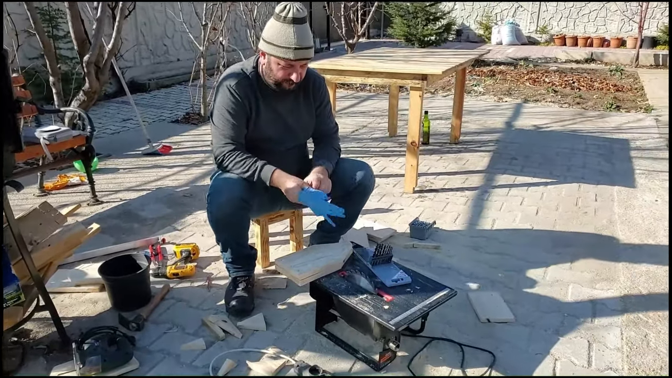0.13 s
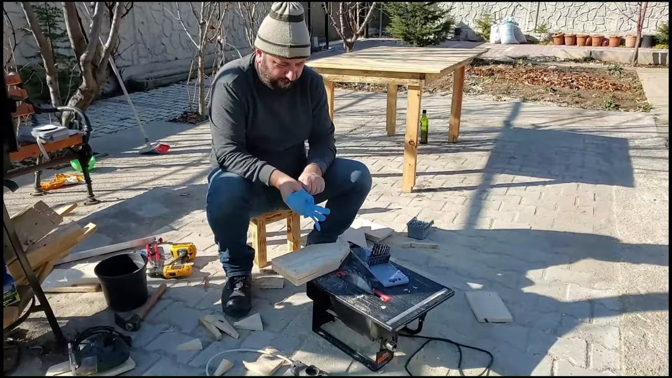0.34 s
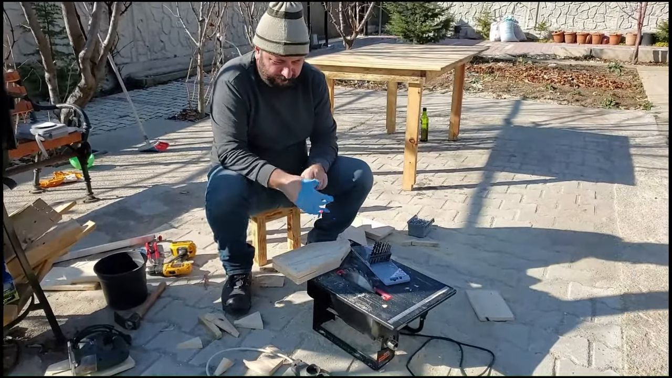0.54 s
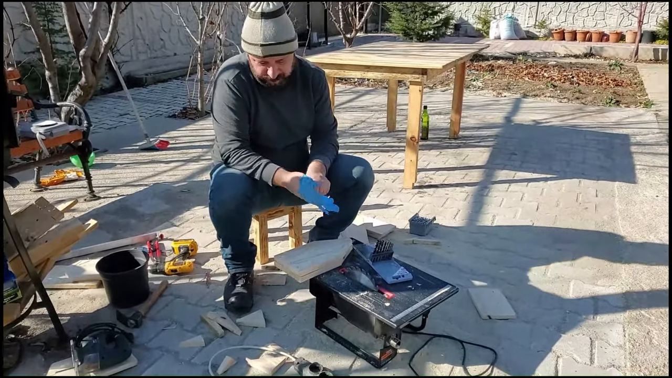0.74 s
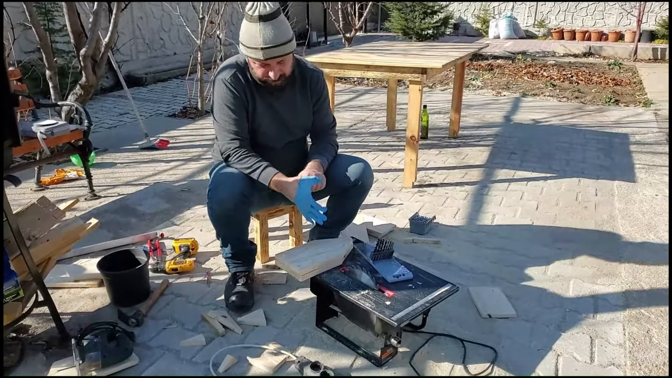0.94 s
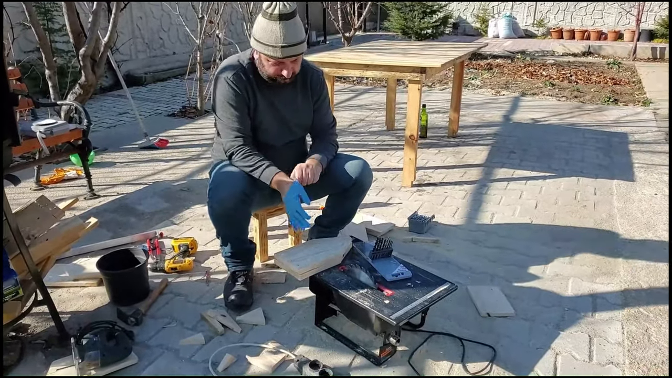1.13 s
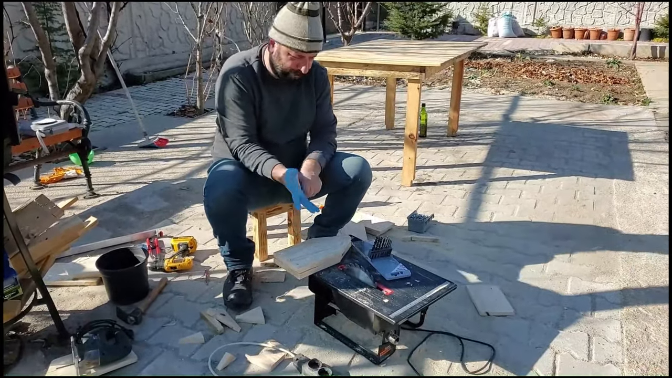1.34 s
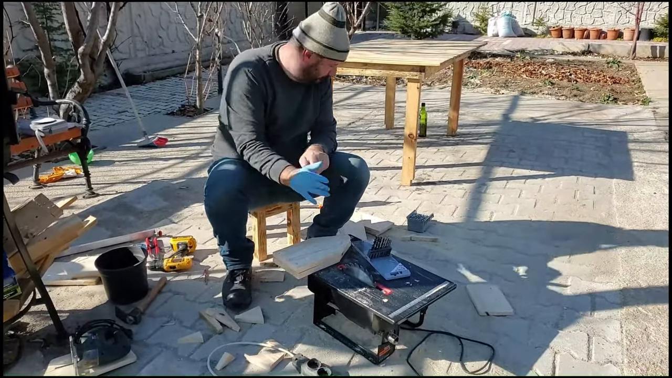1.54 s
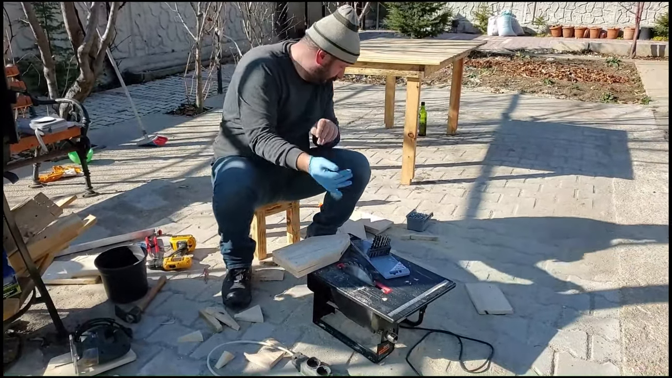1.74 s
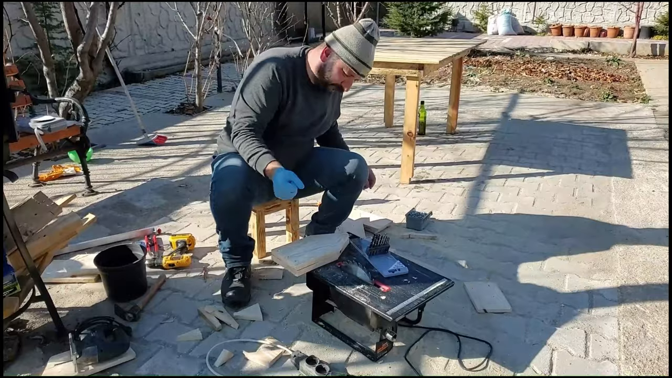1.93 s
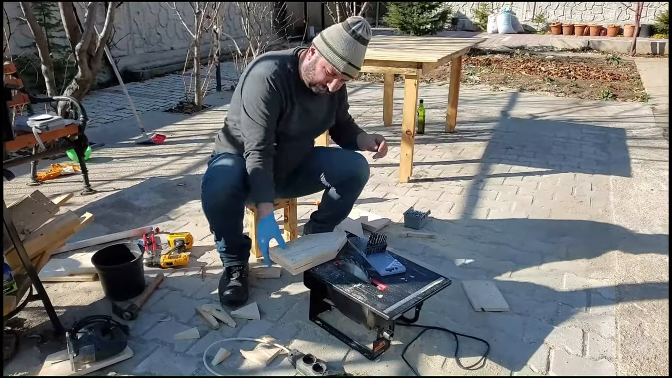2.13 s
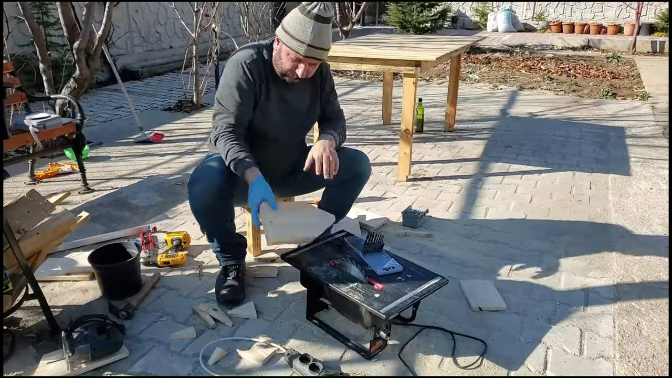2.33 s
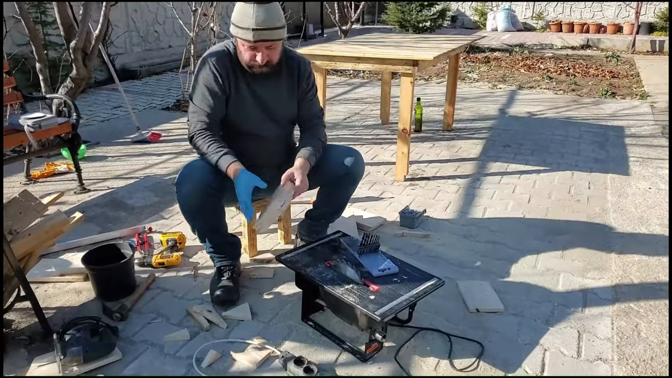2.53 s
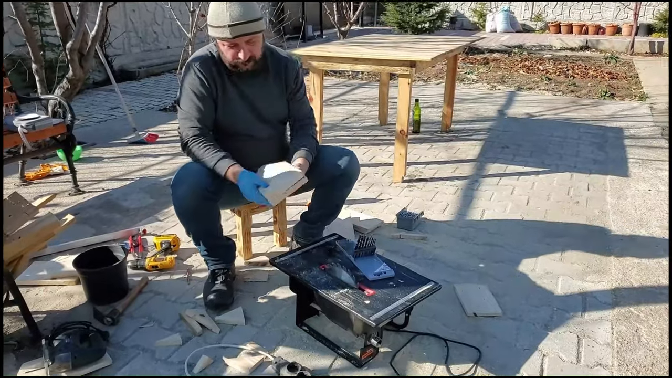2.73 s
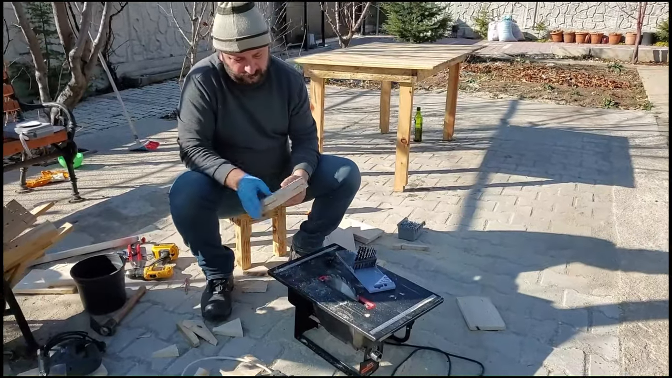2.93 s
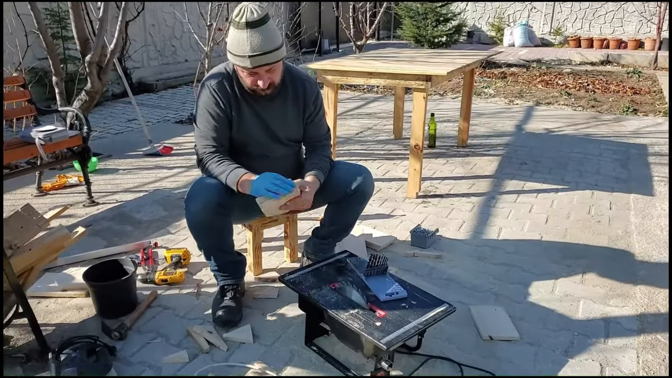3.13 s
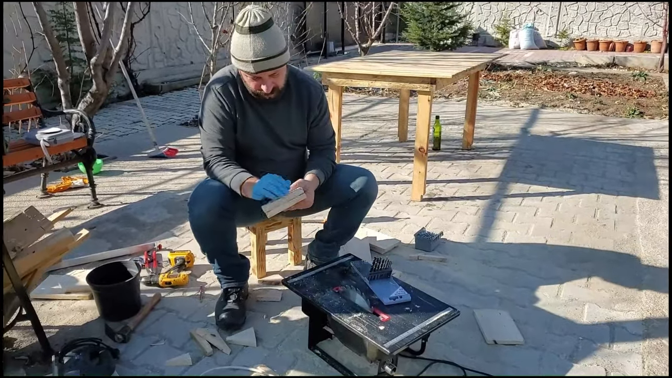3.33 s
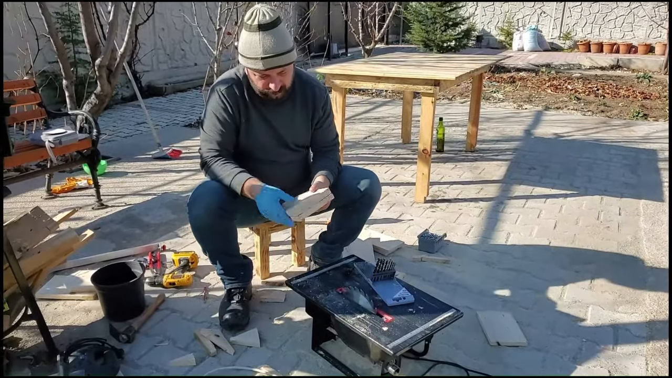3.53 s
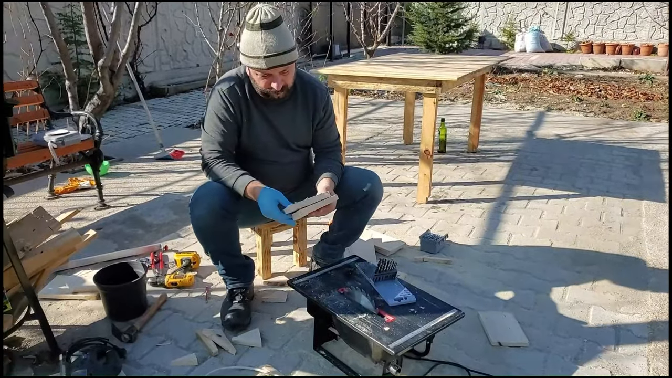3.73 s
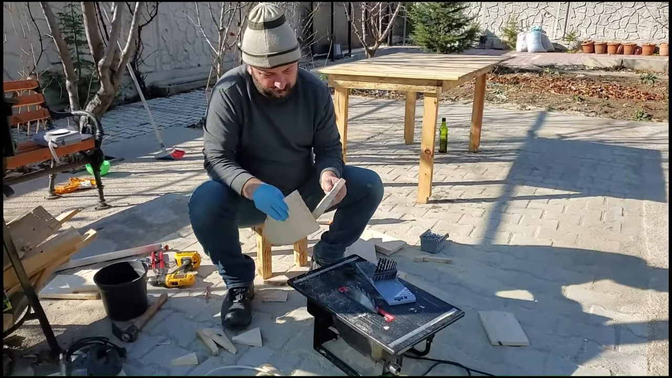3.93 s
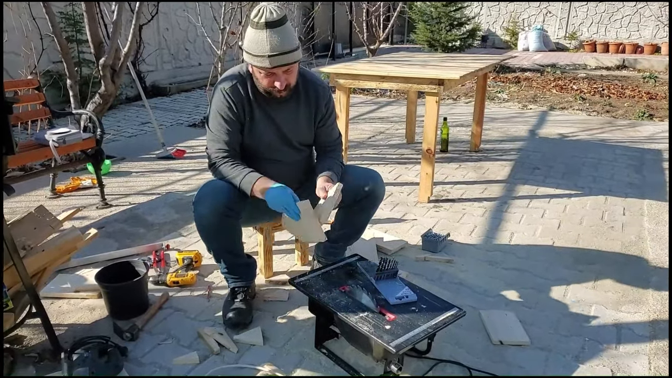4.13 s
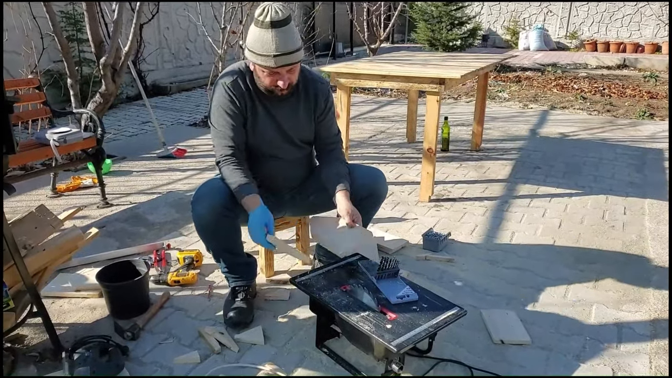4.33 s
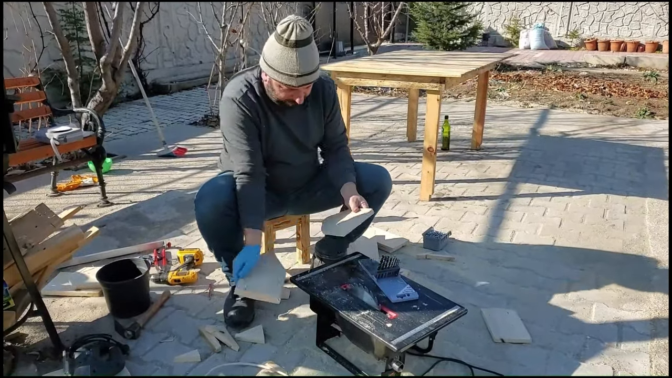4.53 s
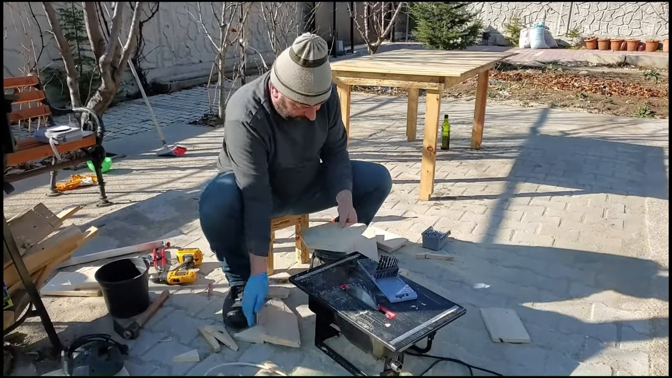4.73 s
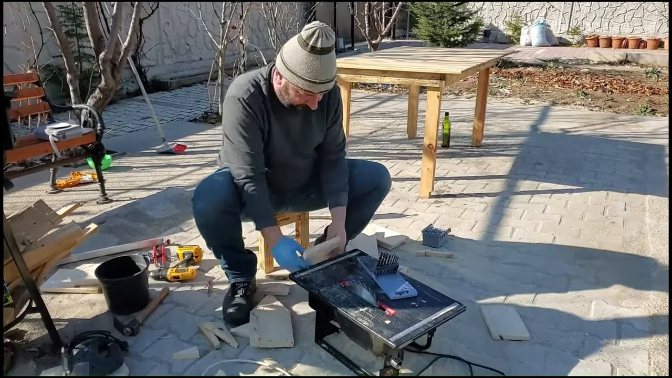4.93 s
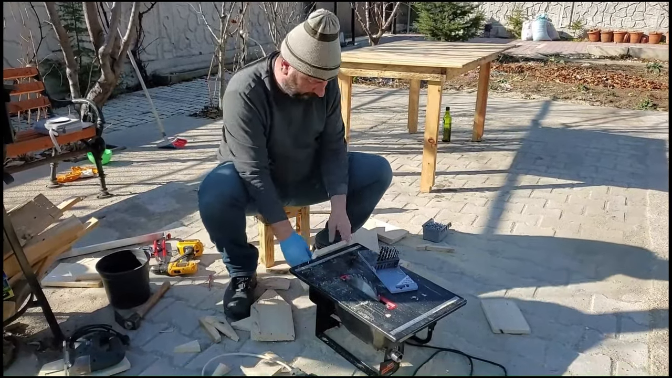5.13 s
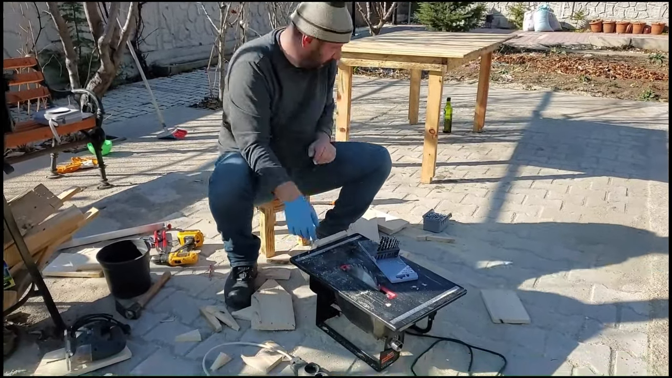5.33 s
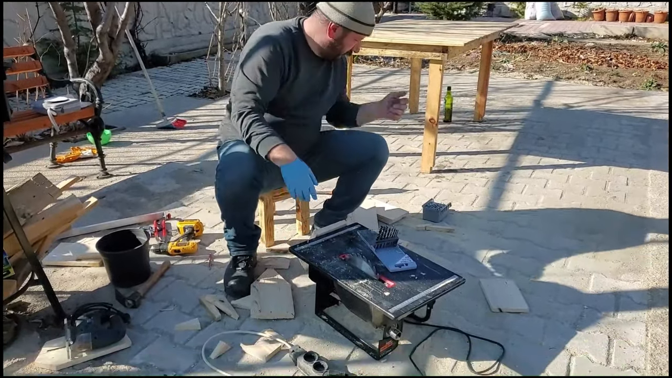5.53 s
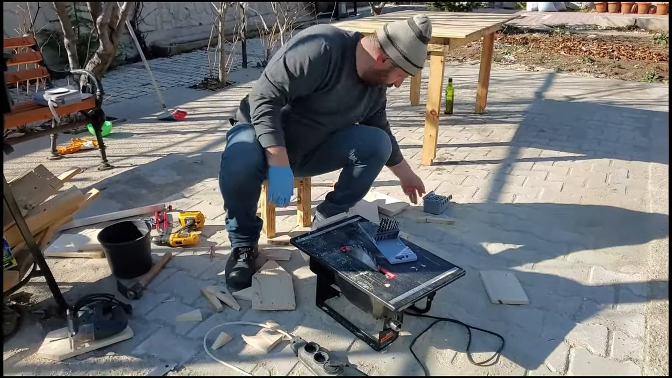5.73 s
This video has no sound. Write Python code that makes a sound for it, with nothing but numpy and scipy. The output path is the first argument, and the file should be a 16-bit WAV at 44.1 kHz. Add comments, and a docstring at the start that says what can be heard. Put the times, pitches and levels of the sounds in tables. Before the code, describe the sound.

Quiet outdoor handling sounds, slightly left of centre: rubber rustles, then snaps and briefly squeaks, followed by soft scuffs. Later come two dry, hollow wood claps, a bright hard clatter as a board is put down, and a soft knock on a saw table. Paving and walls give a short, faint reflection. Underneath are low rumble, a thin hum, light hiss and distant traffic that swells towards the end.

```python
"""Small boards clap together, knock and land on a table saw: damped modes, scrape, tick, thump, rebounds.
Before them a worker in a paved yard tugs a rubber glove tight: clumped noise rubs, damped noise snaps,
a stick-slip tone squeaks and soft bumps thump. Ground and walls answer with decaying noise.
Underneath lie a low outdoor rumble, a thin hiss and a swell of distant traffic with a hum."""
import sys
import numpy as np
from scipy import signal
from scipy.fft import rfft, irfft, next_fast_len
from scipy.io import wavfile
from scipy.ndimage import map_coordinates

SR = 44100
rng = np.random.default_rng(int(sys.argv[2]) if len(sys.argv) > 2 else 0)


def log_audio(samples):
    """Write samples as a 16-bit WAV file to the path given in sys.argv[1]."""
    # one column per channel
    frames = np.atleast_2d(samples).T
    # limit to full scale, then quantise
    limited = np.clip(frames, -1, 1)
    pcm = np.round(limited * 32767).astype(np.int16)
    wavfile.write(sys.argv[1], SR, pcm)


N = 254942


def amp(db):
    """Decibels to gain."""
    return 10 ** (np.asarray(db) / 20)


def unit(x):
    """Scale to rms 1."""
    return x / np.sqrt(np.mean(x ** 2) + 1e-20)


def along(points, hz):
    """Interpolate (Hz, value) points on a log frequency axis."""
    point_hz, value = np.transpose(points)
    return np.interp(np.log(hz + 1), np.log(point_hz + 1), value)


def curves(rows):
    """One value per sample for each column after the time."""
    time_s, *columns = np.transpose(rows)
    return [np.interp(np.arange(N) / SR, time_s, column) for column in columns]


def wobble(rate_hz):
    """A smooth random curve with rate_hz knots a second."""
    knots = rng.standard_normal(int(N * rate_hz / SR) + 4)
    return map_coordinates(knots, [np.arange(N) * rate_hz / SR])


def filtered(x, response):
    """Multiply the spectrum of x by a function of frequency."""
    size = x.shape[-1]
    padded = next_fast_len(size + 8192)
    spectrum = rfft(x, padded) * response(np.fft.rfftfreq(padded, 1 / SR))
    return irfft(spectrum, padded)[..., :size]


def coloured(x, spectrum):
    """Shape x by a (Hz, dB) curve, at rms 1."""
    return unit(filtered(x, lambda hz: amp(along(spectrum, hz))))


def pair(alike, size=N):
    """Left and right white noise sharing the fraction alike of their power."""
    share = np.clip(alike, 0, 1)
    common = np.sqrt(share) * rng.standard_normal(size)
    return common + np.sqrt(1 - share) * rng.standard_normal((2, size))


def blow(x):
    """Scale a short sound to the energy of 10 ms at rms 1."""
    energy = np.mean(np.sum(x ** 2, axis=-1))
    return x / np.sqrt(energy / (SR / 100))


def fade(t, attack_s, t60_s):
    """A quick rise and an exponential decay."""
    return (1 - np.exp(-t / attack_s)) * np.exp(-np.log(1000) * t / t60_s)


def add(track, start_s, sound):
    """Mix a sound into the track, cut at the track's end."""
    part = track[:, round(start_s * SR):][:, :sound.shape[-1]]
    part += sound[..., :part.shape[-1]]


def leading(x, lead_s):
    """Interaural delay: the left side hears x earlier by lead_s."""
    side = np.array([[1], [-1]])
    return filtered(x, lambda hz: np.exp(1j * np.pi * hz * lead_s * side))


# Deep bass. Each row: time in seconds, level in dB.
BASS_LEVEL = [(0.0, -73.5), (0.5, -59.5), (1.72, -66), (2.21, -62.5), (2.38, -67.5), (5.75, -61.5),
              (5.78, -69)]
# Noise colours of rumble, traffic and hiss. Each row: frequency in Hz, level in dB.
RUMBLE_COLOUR = [(10, -22), (25, -12.5), (45, -3), (60, -0.5), (80, -8.5), (110, -15), (160, -25.5),
                 (260, -31), (500, -50.5), (2000, -77)]
TRAFFIC_COLOUR = [(100, 0), (300, 2.5), (650, 0.5), (1200, 3), (1600, -3.5), (2100, -15), (3500, -28),
                  (7000, -41.5), (16000, -53.5)]
AIR_COLOUR = [(100, 12), (700, 14), (1500, -1.5), (3000, 3.5), (7000, -4), (13000, 3), (16000, 0)]
RUMBLE_OVER_BASS_DB, AIR_DB = 3, -88
HUM_DB, HUM_HZ, HUM_SWELL = -57, 64.1, 0.28  # swell: share of the traffic's swell in dB
ROAD_DB, NEAREST_S, PASS_S = -71.5, 4.99, 1.95  # level when nearest, when, half-time of the pass
FALL_DB = 17  # per decade of squared distance


def background():
    """Coloured noise as deep rumble, traffic swelling on the left and hiss; a wavering sine hums."""
    bass_db, = curves(BASS_LEVEL)
    pass_time = (np.arange(N) / SR - NEAREST_S) / PASS_S
    nearness_db = -FALL_DB * np.log10(1 + pass_time ** 2)
    rumble = amp(bass_db + RUMBLE_OVER_BASS_DB) * coloured(pair(alike=0.9), RUMBLE_COLOUR)
    hum_phase = 2 * np.pi * np.cumsum(HUM_HZ + 0.7 * wobble(2)) / SR
    hum = amp(HUM_DB + HUM_SWELL * nearness_db + 0.8 * wobble(3)) * np.sin(hum_phase)
    road_gain = amp(ROAD_DB + nearness_db + 0.5 * wobble(4.3))
    road = road_gain * leading(coloured(pair(alike=0.55), TRAFFIC_COLOUR), lead_s=0.00039)
    return rumble + hum + road + amp(AIR_DB) * coloured(pair(alike=0.11), AIR_COLOUR)


# Decay of the wall tail. Each row: frequency in Hz, t60 in seconds.
WALL_DECAY = [(200, 0.37), (1000, 0.45), (3000, 0.28), (10000, 0.17)]


def yard(x, near_db, near_t60_s, far_db):
    """Paving and nearby clutter scatter the sound at once; the walls add a faint tail."""
    hz, t, bins = signal.stft(rng.standard_normal((2, SR // 2)), SR, nperseg=256)
    decay = np.exp(-np.log(1000) * t / along(WALL_DECAY, hz)[:, None])
    far = signal.istft(bins * decay, SR, nperseg=256)[1]
    t = np.arange(far.shape[1]) / SR
    near = pair(alike=0.093, size=len(t)) * fade(t, 0.0057, near_t60_s)
    near = amp(near_db) * near / np.linalg.norm(near[0])
    far = amp(far_db) * far / np.linalg.norm(far[0])
    delayed = np.pad(near + far, ((0, 0), (SR // 300, 0)))
    return signal.fftconvolve(x, delayed, axes=1)[:, :N]


# Strokes of rubber, sleeve or wood sliding.
# Each row: centre in seconds, half-length in seconds, level in dB, brightness in dB.
RUBS = [(0.219, 0.013, -75, -1), (0.34, 0.06, -86.5, -7), (0.557, 0.014, -78.5, -4),
        (0.71, 0.034, -94.5, 18), (0.88, 0.0081, -75, -3), (1.003, .017, -81, 5), (1.066, 0.031, -79, 6),
        (1.237, 0.031, -64.5, 1), (1.266, 0.0068, -55.5, 2.5), (1.31, 0.058, -70, -2.5),
        (1.436, .014, -52.5, -1.5), (1.484, 0.02, -69.5, -1.5), (1.584, 0.0097, -61, -1.5),
        (1.798, 0.015, -79.5, 11.5), (1.896, 0.02, -82.5, 8.5), (2.168, 0.014, -78, 8),
        (2.222, .01, -70.5, 11), (2.373, .035, -71.5, 5), (2.691, .034, -85, 9), (2.853, 0.031, -86.5, 0.5),
        (3.053, 0.053, -86.5, -6), (3.198, .02, -78.5, -4.5), (3.285, 0.0124, -85.5, 16),
        (3.583, 0.012, -78, 1), (3.674, 0.03, -66.5, 2.5), (3.777, 0.018, -73.5, -0.5),
        (4.332, 0.031, -79.5, -2.5), (4.702, .008, -51.5, 6.5), (4.807, 0.047, -75.5, 0),
        (5.775, 0.024, -70, -7.5)]
# Noise colours of the low, middle and high parts. Each row: frequency in Hz, level in dB.
SWISH_COLOUR = [(100, 0), (330, -15.5), (500, 2), (800, -2), (1300, -0.5), (2200, -23), (6000, -49)]
RASP_COLOUR = [(500, -37.5), (1200, -2), (1900, 0.5), (2700, -0.5), (3600, -2.5), (5200, -8.5),
               (7000, -16.5), (16000, -56)]
TICK_COLOUR = [(500, -39), (3000, -3), (5000, 4.5), (6800, -5), (8300, 2.5), (11000, 0), (14500, -1),
               (17000, 6)]  # also snap sizzle and contact grit
SWISH_DB, HISS_DB = -1.5, -4  # re stroke level, at brightness 0
RASP_LOSS = 0.11  # dB per dB of brightness either way
FIDGET_DB, FIDGET_SWING_DB, FIDGET_RATE_HZ = -95.5, 4, 9  # faint rubbing of hands that never rest


def rubs():
    """Each stroke is a swell of tiny slips; rubber catches unevenly, so the grains clump."""
    t = np.arange(N) / SR
    fidget = amp(FIDGET_DB + FIDGET_SWING_DB * wobble(FIDGET_RATE_HZ))
    power = np.ones((3, 1)) * fidget ** 2
    for centre_s, half_s, db, bright_db in RUBS:
        balance_db = np.array([SWISH_DB - bright_db, -RASP_LOSS * abs(bright_db), HISS_DB + bright_db])
        near = np.abs(t - centre_s) < 4 * half_s
        swell = np.exp(-((t[near] - centre_s) / half_s) ** 2)
        power[:, near] += amp(db + balance_db)[:, None] ** 2 * swell
    swish, rasp, hiss = np.sqrt(power)
    catch = amp(2.0 * wobble(260) + 5.7 * wobble(1500))
    low = swish * coloured(catch * pair(alike=0.79), SWISH_COLOUR)
    middle = rasp * coloured(catch * pair(alike=0.16), RASP_COLOUR)
    high = hiss * coloured(np.sqrt(catch) * pair(alike=0.26), TICK_COLOUR)
    return low + middle + high


# A rubbed surface sings at one resonance.
# Each row: centre in seconds, half-length in seconds, pitch in Hz, level in dB.
CHIRRS = [(0.57, 0.023, 730, -77), (1.064, .017, 660, -73.5), (1.217, 0.015, 1830, -57),
          (1.221, 0.019, 2480, -58), (1.478, 0.02, 2780, -63), (2.159, 0.014, 1450, -73.5),
          (3.189, 0.0081, 3460, -77.5)]


def chirrs():
    """Slips feed a narrow resonance, so the rubbing takes on a rough pitch."""
    out, t = np.zeros((2, N)), np.arange(SR // 4) / SR
    middle_s = t.mean()
    for centre_s, half_s, pitch_hz, db in CHIRRS:
        slips = pair(alike=0.58, size=len(t)) * amp(2.2 * wobble(298)[:len(t)])
        voice = unit(filtered(slips, lambda hz: 1 / (1 + ((hz / pitch_hz - 1) / 0.12) ** 2)))
        swell = np.exp(-((t - middle_s) / half_s) ** 2 / 2)
        add(out, centre_s - middle_s, amp(db) * voice * swell)
    return out


# Rubber sticks and slips on the wrist.
# Each row: time in seconds, pitch in Hz, level in dB, overtone level in dB.
SQUEAK = [(1.295, 592, -71, -5), (1.315, 655, -61, -2), (1.333, 721, -63, -3), (1.341, 546, -59.5, -1),
          (1.349, 615, -53, -18), (1.364, 676, -57, -22), (1.378, 680, -85, -18)]


def squeak():
    """Stick-slip at the cuff: a short wavering tone, purer and steadier as its overtones weaken."""
    pitch_hz, db, overtone_db = curves(SQUEAK)
    rough = amp(overtone_db)
    phase = 2 * np.pi * np.cumsum(pitch_hz * (1 + 0.1374 * rough * wobble(350))) / SR
    t = np.arange(N) / SR
    sounding = (t > SQUEAK[0][0]) & (t < SQUEAK[-1][0])
    tone = np.sin(phase) + rough * np.sin(2 * phase) + 0.5 * rough ** 2 * np.sin(3 * phase)
    return sounding * amp(db) * tone


# Sharp snaps of rubber on skin and of wood edges.
# Each row: start in seconds, level in dB, pitch in Hz, t60 in seconds, sizzle in dB re the crack.
SNAPS = [(0.987, -70, 8950, .017, 7), (1.261, -54, 2400, 0.068, -11), (1.4218, -55, 1710, 0.021, -21),
         (1.439, -47.5, 2550, 0.028, -21), (1.495, -63.5, 2830, 0.017, -18),
         (1.5401, -58.5, 2580, 0.015, -8), (1.552, -61, 2960, 0.031, -17), (1.581, -53, 2700, 0.04, 3.5),
         (2.217, -61, 3500, 0.032, 13), (2.371, -63, 1900, 0.042, 1), (3.028, -77, 1360, 0.049, -11),
         (3.234, -74.5, 4540, 0.037, 18), (3.7355, -60.5, 1860, 0.021, -15.5),
         (3.8009, -68.5, 9500, 0.012, -7.5), (4.663, -46, 3800, 0.027, -12),
         (4.6701, -37, 2860, .015, -24.5)]
SNAP_ATTACK_S = 0.0011


def snaps():
    """Stretched rubber or a caught edge lets go: a broad, heavily damped crack with a sizzle on top."""
    out, t = np.zeros((2, N)), np.arange(SR // 10) / SR
    for start_s, db, pitch_hz, t60_s, sizzle_db in SNAPS:
        def resonance(hz):
            """Broad peak at the snap's pitch."""
            return 1 / (1 + (1.3 * (hz / pitch_hz - pitch_hz / (hz + 1))) ** 2) ** 1.5

        crack = unit(filtered(pair(alike=1.0, size=len(t)), resonance))
        sizzle = amp(sizzle_db) * coloured(pair(alike=0.44, size=len(t)), TICK_COLOUR)
        add(out, start_s, amp(db) * blow((crack + sizzle) * fade(t, SNAP_ATTACK_S, t60_s)))
    return out


def thump(pitch_hz, t60_s):
    """A soft mass takes a push and stops within a few cycles."""
    def resonance(hz):
        """Broad peak at the thump's pitch."""
        return 1 / (1 + (hz / pitch_hz - pitch_hz / (hz + 1)) ** 2) ** 1.18

    t = np.arange(SR // 5) / SR
    flesh = unit(filtered(rng.standard_normal(len(t)), resonance))
    push = np.sin(2 * np.pi * pitch_hz * t) * fade(t, 0.0026, t60_s / 2)
    return blow(push + 0.41 * flesh * fade(t, 0.003, t60_s))


# Soft bumps of hands, shoes and a board's flat face.
# Each row: start in seconds, level in dB, pitch in Hz, t60 in seconds.
BUMPS = [(0.301, -68.5, 448, 0.11), (.395, -59.5, 179, 0.21), (.883, -65, 486, .072),
         (1.439, -56, 475, 0.039), (1.541, -62, 350, 0.019), (1.581, -55.5, 191, 0.028),
         (1.583, -57, 500, 0.025), (3.736, -66.5, 280, .029), (4.899, -40.5, 288, .046),
         (5.619, -55.5, 264, 0.036)]


def bumps():
    """Soft contacts thump without ringing."""
    out = np.zeros((2, N))
    for start_s, db, pitch_hz, t60_s in BUMPS:
        add(out, start_s, amp(db) * thump(pitch_hz, t60_s))
    return out


# Noise colour of wood scraping. Each row: frequency in Hz, level in dB.
SCRAPE_COLOUR = [(60, -5), (250, 1), (800, 5.5), (1500, 3), (2600, -3.5), (3500, -16.5), (5000, -22),
                 (7000, -37), (16000, -56.5)]
SCRAPE_DB, TICK_DB = -7.5, -29.5  # re the ring of a firm blow, at hardness 0
SCRAPE_T60_S, TICK_T60_S = 0.042, 0.03
FIRM_DB, GLANCING, GLANCING_MAX_DB = -30.5, 0.6, 9  # scrape dB gained per dB below firm, and its limit


def contact(modes, db, favoured_hz, focus_db, hard_db, size):
    """One contact rings a body's modes, favouring those near a pitch, with a scrape and a gritty tick."""
    t = np.arange(size) / SR
    hz, level_db, t60_s = np.transpose(modes)[:, :, None]
    hz = hz * (1 + rng.normal(0, 1, hz.shape) / 250)  # grip and support shift the modes a little
    spot_db = focus_db * np.exp(-(np.log2(hz / favoured_hz) / 0.78) ** 2)
    strength = amp(level_db + spot_db + rng.normal(0, 0.92, (2, *hz.shape)))
    sign = (-1) ** np.arange(len(hz))[:, None]  # neighbouring modes swing opposite ways
    skew = rng.normal(0, 0.24, strength.shape) * np.sqrt(hz / 1000)  # phase differs between the sides
    tones = sign * strength * np.sin(2 * np.pi * hz * t + skew)
    ring = np.sum(tones * fade(t, 0.0033, t60_s), axis=1)
    scrape = coloured(pair(alike=0.7, size=size), SCRAPE_COLOUR) * fade(t, 0.0011, SCRAPE_T60_S)
    tick = coloured(pair(alike=0.35, size=size), TICK_COLOUR) * fade(t, 0.001, TICK_T60_S)
    glance_db = min(GLANCING * (FIRM_DB - db), GLANCING_MAX_DB)  # lighter contacts glance
    grit = amp(SCRAPE_DB + glance_db) * blow(scrape) + amp(TICK_DB) * blow(tick)
    return amp(db) * (blow(ring) + amp(hard_db) * grit)


# Modes of the two boards held together, the loose board and the saw table.
# Each row: frequency in Hz, level in dB, t60 in seconds.
HELD_MODES = [(240, -14, 0.048), (466, -7.5, 0.023), (687, 5.5, 0.02), (810, -2.5, 0.032), (896, -4, 0.025),
              (959, -18.5, 0.057), (1170, -14.5, 0.059), (1451, -3, 0.038), (2050, -18, 0.046),
              (2131, -13, 0.042), (2470, -7, 0.025), (2780, -16, 0.025), (3350, -26, 0.062)]
BOARD_MODES = [(479, -8.5, 0.082), (740, -21, .04), (936, 0, 0.028), (1140, 0, 0.041), (1290, -14, .04),
               (1367, 2, 0.025), (1540, -13, .025), (1803, -1.5, 0.033), (2247, -5.5, 0.028),
               (2543, 4, 0.02), (2760, -12.5, 0.021), (2974, -7.5, 0.032), (3230, -19.5, 0.044),
               (3370, -24, 0.065), (3960, -29.5, 0.028), (4360, -21, 0.044), (4540, -26.5, 0.099)]
SAW_MODES = [(402, 1.5, 0.026), (578, 0.5, 0.074), (687, 6.5, 0.036), (690, -32.5, 0.7), (766, -5, 0.064),
             (1014, -7, 0.095), (1380, -3.5, 0.022), (1730, -20, 0.033), (2267, -9.5, 0.066),
             (2480, -1.5, 0.019), (4050, -26, 0.06)]
# Wood blows. Each row: start in seconds, body (0 held pair, 1 board, 2 saw), level in dB,
# favoured pitch in Hz, focus in dB, hardness in dB, first rebound in dB re the blow.
KNOCKS = [(3.860, 0, -28, 640, 5, -2, -23), (3.873, 0, -32.5, 1600, 11, 0, -8.5),
          (4.028, 0, -25.5, 775, 8, -3.5, -21), (4.0615, 0, -40, 770, 6, -0.5, -17.5),
          (4.636, 1, -46, 1237, 9.5, -1.5, -17.5), (4.655, 1, -48, 2380, 10.5, 1, -12.5),
          (4.664, 1, -33, 2600, 0, 0.5, -18.5), (4.671, 1, -27.5, 2730, 12, -4.5, -20),
          (4.705, 1, -47.5, 2000, 5.5, 0.5, -21.5), (4.7469, 1, -31.5, 1250, 9.5, 1, -26.5),
          (4.799, 1, -55, 920, 32.5, -4.5, -14), (4.898, 2, -36, 650, -0.5, -3, -18),
          (4.979, 2, -39, 542, 21, -10.5, -12.5)]
THUMP_DB, THUMP_HZ, THUMP_T60_S = -14, 159, 0.011  # push of the board's mass, re a flat blow
FLAT_HZ, EDGE_DB_PER_OCTAVE = 740, 7  # blows nearer an edge favour higher pitches and thump less
REBOUND_S, REBOUND_SCATTER, REBOUND_LOSS_DB = 0.0115, 0.15, 4.5  # gap, its unevenness (share), loss each
REBOUND_RING, REBOUND_WANDER_OCTAVES = 0.7, 0.4  # share of t60 left in touching wood; pitch drift


def knocks(count=5):
    """Each blow rings and thumps, then chatters in ever weaker, damped rebounds on wandering spots."""
    out = np.zeros((2, N))
    for start_s, body, db, favoured_hz, focus_db, hard_db, rebound_db in KNOCKS:
        modes = np.array([HELD_MODES, BOARD_MODES, SAW_MODES][round(body)])
        add(out, start_s, contact(modes, db, favoured_hz, focus_db, hard_db, size=SR // 3))
        edge_db = EDGE_DB_PER_OCTAVE * max(np.log2(favoured_hz / FLAT_HZ), 0)
        add(out, start_s, amp(db + THUMP_DB - edge_db) * thump(THUMP_HZ, THUMP_T60_S))
        pressed = modes * [1, 1, REBOUND_RING]
        for k, (slip, wander) in enumerate(rng.standard_normal((count, 2))):
            spot_hz = favoured_hz * 2 ** (REBOUND_WANDER_OCTAVES * wander)
            weaker_db = db + rebound_db - REBOUND_LOSS_DB * k
            rebound = contact(pressed, weaker_db, spot_hz, focus_db / 2, hard_db, size=SR // 12)
            add(out, start_s + REBOUND_S * (k + 1 + REBOUND_SCATTER * slip), rebound)
    return out


# Colour of the yard's answer. Each row: frequency in Hz, gain in dB.
YARD_COLOUR = [(150, 1.5), (700, -4.5), (2500, -2), (5000, 1), (12000, -4.5)]
# Side balance of the work. Each row: frequency in Hz, left minus right in dB.
LEFT_BALANCE = [(100, -1), (350, 0.3), (700, 2.5), (1150, 3), (2400, 2), (4400, 2.5), (8000, 9.5),
                (15000, 6.5)]


def scene():
    """The hands work slightly left of centre: earlier and brighter on that side."""
    work = rubs() + chirrs() + snaps() + squeak() + bumps() + knocks()
    answer = yard(work, near_db=-13.5, near_t60_s=0.053, far_db=-22.5)
    work = work + filtered(answer, lambda hz: amp(along(YARD_COLOUR, hz)))
    side = np.array([[0.5], [-0.5]])
    balanced = filtered(work, lambda hz: amp(side * along(LEFT_BALANCE, hz)))
    return leading(balanced, lead_s=0.00005) + background()


BAND_LIMIT_HZ = 15620


def record(dry):
    """A steep low-pass keeps nothing above the band limit."""
    return filtered(dry, lambda hz: hz < BAND_LIMIT_HZ)


dry = scene()
out = record(dry)
log_audio(out)
```